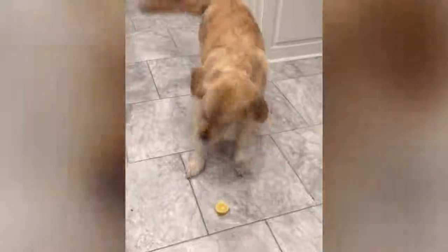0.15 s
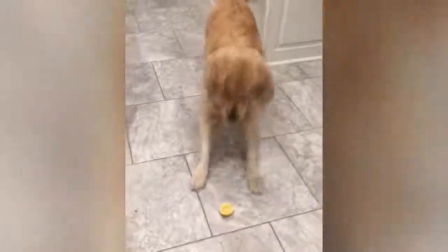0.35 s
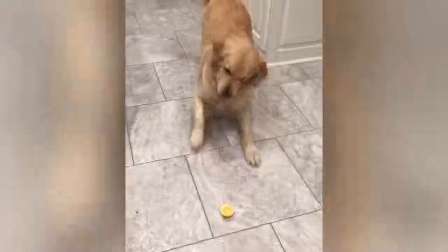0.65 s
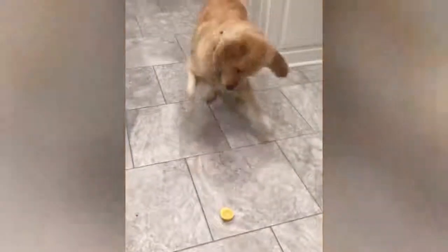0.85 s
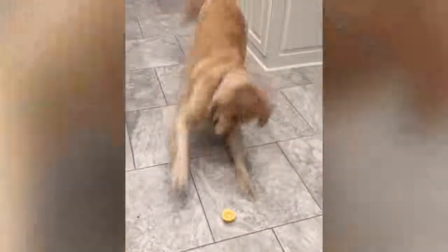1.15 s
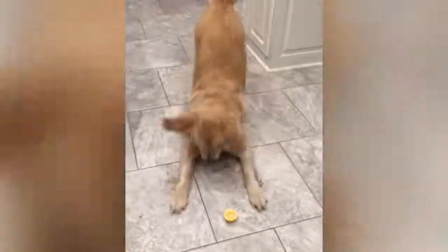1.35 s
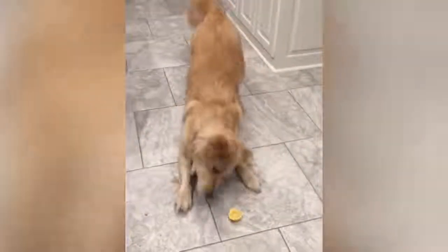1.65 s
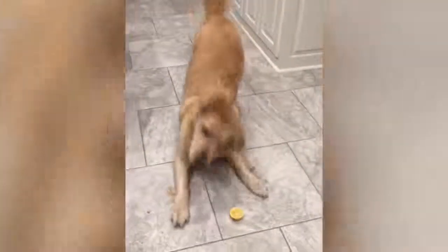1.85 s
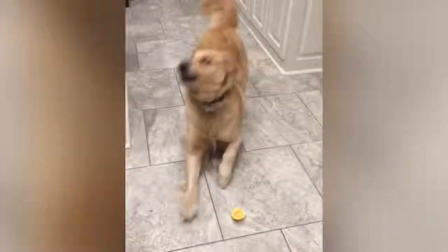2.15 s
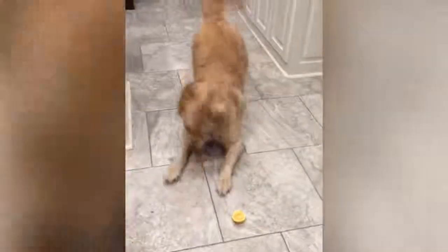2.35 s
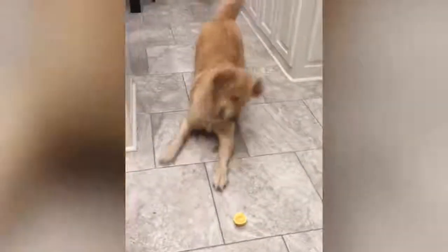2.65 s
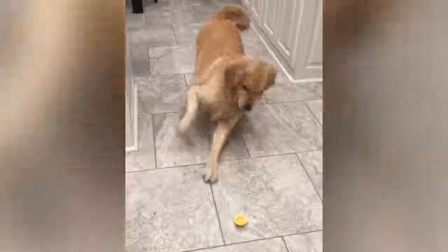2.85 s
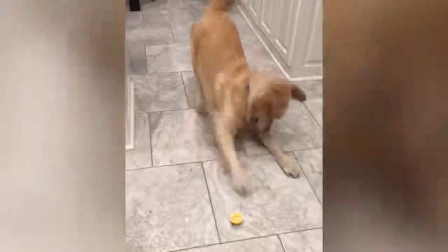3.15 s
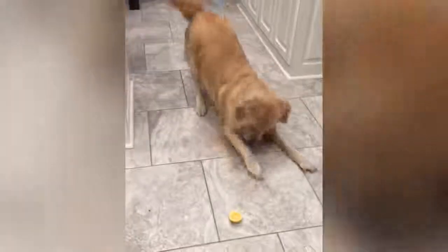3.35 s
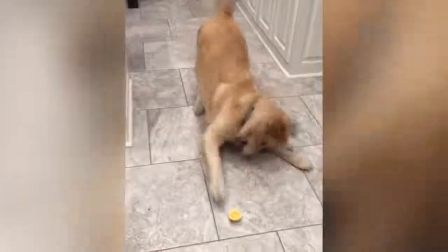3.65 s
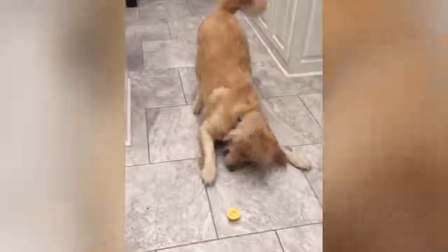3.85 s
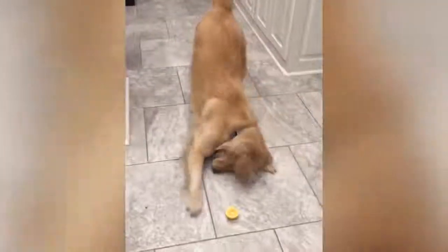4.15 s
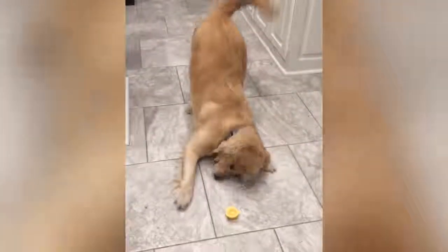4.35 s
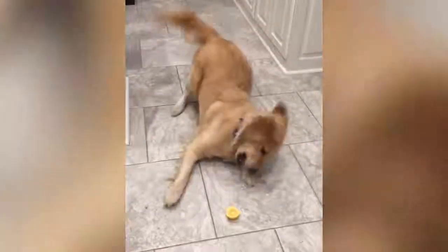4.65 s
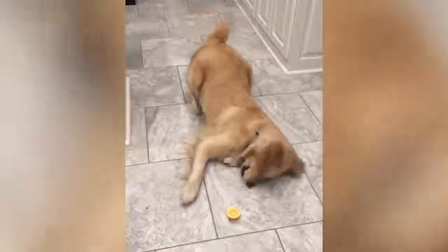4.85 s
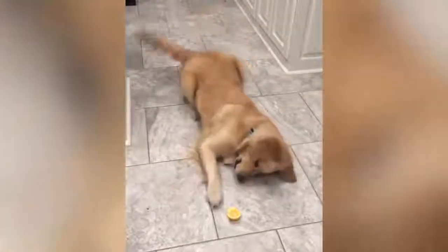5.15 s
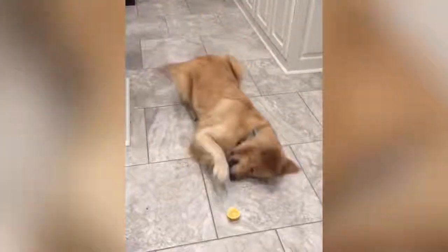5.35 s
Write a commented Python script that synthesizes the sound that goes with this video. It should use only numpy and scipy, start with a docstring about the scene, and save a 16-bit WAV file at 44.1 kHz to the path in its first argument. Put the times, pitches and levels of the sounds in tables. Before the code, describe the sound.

A dog plays on a tiled kitchen floor, a step or two away, over a very faint low hush. From about 0.4 seconds its claws click sharply several times, with a breathy nose huff at 0.5. At 1.3 it lands a pounce with a loud clack, a pad slap and soft body thumps. Between 1.9 and 2.6 its metal collar tags clink lightly amid more clacks and gritty scrapes, with another huff at 2.3. Scrabbling and short huffs lead to a second hard landing at 3.2. Faint pad squeaks follow near 3.6, then single sharp clacks at 3.7 and 4.2, the first with a huff, the second with a thump. Fur and paws then rub softly along the floor. A tag rings near 5 seconds, followed by one more clack and small snort-like sputters around 5.3. The hard room rings briefly throughout.

```python
"""Scrapes and sharp claw clacks on kitchen tile: a dog pounces, scuffles and rubs its face on the floor.
Claws strike the hard glaze, pads slap and squeak, the body thumps down, paws and fur drag along.
The dog huffs through its nose, with a few snort-like sputters, and two metal tags clink on its collar.
It is all a step or two away, in a hard room that rings briefly."""
import sys
import numpy as np
from scipy import signal
from scipy.io import wavfile

SR = 44100
rng = np.random.default_rng(int(sys.argv[2]) if len(sys.argv) > 2 else 0)


def to_wav(s):
    """Save 16-bit WAV."""
    ch = np.atleast_2d(s).T  # columns
    pcm = np.round(np.clip(ch, -1, 1) * 32767)  # PCM
    wavfile.write(sys.argv[1], SR, pcm.astype(np.int16))


N = 243431
TIME = np.arange(N) / SR


def amp(db):
    """Decibels to gain."""
    return 10 ** (np.asarray(db) / 20)


def unit(x):
    """Scales to rms 1."""
    return x / np.sqrt(np.mean(x ** 2) + 1e-20)


def read(points, hz):
    """Reads a curve along a logarithmic frequency axis."""
    freqs, values = np.transpose(points)
    return np.interp(np.log(hz + 1e-6), np.log(freqs), values)


def add(mix, start, sound):
    """Mixes a sound in at a start time in seconds."""
    part = mix[max(round(start * SR), 0):][:len(sound)]
    part += sound[:len(part)]


def colour(x, tone, size=4096):
    """Shapes a sound with an EQ curve of (Hz, dB) points: a minimum-phase filter of energy 1."""
    log_gain = np.log(amp(read(tone, abs(np.fft.fftfreq(size, 1 / SR)))))
    spectrum = np.exp(np.conj(signal.hilbert(log_gain)))
    impulse = np.fft.ifft(spectrum).real[:size // 2]
    return signal.oaconvolve(x, impulse / np.linalg.norm(impulse))[:len(x)]


def hiss(tone):
    """Steady coloured noise of rms 1."""
    return unit(colour(rng.standard_normal(N), tone))


def flutter(depth_db, step_s):
    """A gain that wanders at random."""
    knots = np.arange(0, N / SR + 1, step_s)
    return amp(depth_db * np.interp(TIME, knots, rng.standard_normal(len(knots))))


def room_tone(level_db=-68.5):
    """The faint, low hush of the still kitchen."""
    # Spectrum of the hush. Each row: frequency in Hz, relative level in dB.
    hush_tone = [(15, -80), (25, -41), (70, -3.5), (166, -1.5), (217, -4), (373, -6.5), (427, -12),
                 (516, -11.5), (607, -11.5), (840, -13), (911, -11.5), (988, -14.5), (1290, -14.5),
                 (16000, -40.5)]
    return amp(level_db) * hiss(hush_tone)


def room(x, wet_db=-4, build_s=0.00047, size=256):
    """The direct sound, a few hard reflections and a short diffuse tail whose top dies first."""
    # Ring of the kitchen. Each row: frequency in Hz, seconds to fall by 60 dB.
    ring_times = [(100, 0.36), (400, 0.64), (1200, 0.42), (3000, 0.52), (7000, 0.42), (15000, 0.2)]
    # Reflections off floor, cabinets and ceiling. Each row: delay in seconds, gain.
    echoes = [(.0021, 0.094), (.0056, 0.14), (0.013, 0.11), (0.0152, .24), (.0235, 0.14)]
    n = SR * 3 // 4
    scatter = rng.standard_normal(n) * (rng.random(n) < 0.15)
    hz, t, spectra = signal.stft(scatter, SR, nperseg=size)
    fade = amp(-60 * t / read(ring_times, hz)[:, None])
    tail = signal.istft(spectra * fade, SR, nperseg=size)[1]
    tail *= 1 - np.exp(-TIME[:len(tail)] / build_s)
    response = amp(wet_db) * tail / np.linalg.norm(tail)
    direct = (0.00011, 1)
    for delay, gain in [direct] + echoes:
        add(response, delay, [gain])
    return signal.fftconvolve(x, response)[:N]


def pad_squeaks(wobble=0.24, slip_s=0.0011):
    """A pad sticks and slips on the glaze: a faint, rough squeak."""
    # Skidding pads. Each row: start in seconds, level in dB, pitch in Hz, length in seconds.
    skids = [(2.184, -58.5, 892, 0.04), (3.118, -59, 878, 0.022), (3.636, -50.5, 1480, 0.0097),
             (3.639, -56.5, 2114, 0.031)]
    out = np.zeros(N)
    for start, db, hz, length in skids:
        t = np.arange(0, length, 1 / SR)
        jitter = np.interp(t / slip_s, np.arange(100), rng.standard_normal(100))
        pitch = hz * (1 + wobble * jitter)
        arch = np.sqrt(np.sin(np.pi * t / length).clip(0))
        add(out, start, amp(db) * arch * np.sin(2 * np.pi * np.cumsum(pitch) / SR))
    return out


def collar_tags(tick_db=-8, tick_s=0.0075, touch_count=4):
    """Two small metal discs chatter together; hard knocks bring out top modes, fur muffles the ring."""
    # Knocks of the tags. Each row: start in seconds, relative levels of the first and second tag in dB,
    # hardness as a treble boost in dB, chatter length in seconds, muffling in dB per second.
    clinks = [(1.068, -63, -70, 12, 0.0053, 1202), (1.899, -44.5, -43, -8, .004, 170),
              (2.122, -50, -57, 11, 0.0085, 300), (2.132, -43.5, -48, 8.5, .0073, 280),
              (2.27, -53, -51, -3, .0014, 246), (2.297, -41, -53, -3, 0.01, 90),
              (2.451, -51.5, -51, -1, 0.01, 404), (2.557, -58, -48.5, 6, 0.012, 298),
              (4.651, -64, -58, 6, 0.0012, 250), (4.868, -57.5, -62, -1, 0.0044, 150),
              (4.9665, -37.5, -66, -1, 0.002, 22), (5.002, -62, -47.5, 8, .0016, 57)]
    # Modes of each disc. Each row: frequency in Hz, relative level in dB, seconds to fall by 60 dB.
    first_tag = [(2611, -21, .3), (5776, -21, .12), (8066, 0, .36), (9865, -11, .16), (12750, -16, .12),
                 (14825, 0, .21)]
    second_tag = [(2213, -18, .25), (7102, 0, .3), (9512, -12, .1), (10640, -8, .14), (12880, -10, .1),
                  (15154, -1, .14)]
    out, t = np.zeros(N), TIME[:SR // 2]
    for start, first_db, second_db, hard_db, chatter, muffle in clinks:
        touches = np.linspace(0, chatter, touch_count)
        drive = sum(t >= touch for touch in touches) / touch_count  # each touch feeds the ring
        ring = drive * amp(-muffle * t)
        for modes, tag_db in ((first_tag, first_db), (second_tag, second_db)):
            for hz, mode_db, t60 in modes:
                treble_share = np.clip((hz - 8000) / 7000, 0, 1)
                # the swinging disc turns each mode towards and away from the listener
                swing_db = 2.5 * np.interp(t, np.linspace(0, 0.5, 60), rng.standard_normal(60))
                level = amp(tag_db + mode_db + treble_share * hard_db + swing_db - 60 * t / t60)
                add(out, start, ring * level * np.sin(2 * np.pi * (hz * t + rng.random())))
        tick_gain = amp(first_db + min(hard_db, hard_db / 2) + tick_db)
        for touch in touches:
            tick = np.diff(rng.standard_normal(len(t) + 1)) * np.exp(-t / tick_s)
            add(out, start + touch, tick_gain * tick)
    return out


def nose_huffs(gain_db=-2, rest_hz=1660, relax_s=0.057, size=512):
    """Turbulent air rings in the nose; the resonance sinks towards rest as each huff runs out."""
    # Breaths. Each row: start in seconds, relative level in dB, push in seconds, opening resonance in Hz.
    huffs = [(0.547, -43.5, 0.16, 3200), (1.711, -59.5, 0.0084, 2920), (2.291, -46.5, 0.11, 2900),
             (2.605, -55, .09, 2060), (2.697, -47.5, 0.032, 1866), (2.85, -53.5, 0.035, 2230),
             (3.308, -50.5, 0.058, 2150), (3.353, -51.5, 0.043, 3020), (3.768, -46, 0.096, 3020),
             (3.935, -55, .13, 2020), (5.11, -57, 0.013, 2700), (5.216, -64, 0.011, 1860),
             (5.292, -61, 0.04, 1910)]
    # Nostril colour. Each row: multiple of the resonance, relative level in dB.
    nose_tone = [(.01, -71), (.1, -42), (.22, -14.5), (.4, -11), (.7, -2), (1, 2), (1.3, 3.5), (1.8, -6.5),
                 (3, -14.5), (7, -24.5)]
    rise_s, sag_db_per_s, release_db_per_s = 0.014, 34, 197  # a quick push weakens, then lets go
    out, t = np.zeros(N), TIME[:SR // 2]
    gusts = flutter(depth_db=2.5, step_s=0.0055)
    for start, db, push, start_hz in huffs:
        hz, frame_times, spectra = signal.stft(rng.standard_normal(len(t)), SR, nperseg=size)
        resonance = rest_hz + (start_hz - rest_hz) * np.exp(-frame_times / relax_s)
        spectra *= amp(read(nose_tone, hz[:, None] / resonance))
        breath = unit(signal.istft(spectra, SR, nperseg=size)[1][:len(t)])
        spent_db = sag_db_per_s * t + release_db_per_s * np.maximum(t - push, 0)
        add(out, start, breath * np.minimum(t / rise_s, 1) * amp(db - spent_db))
    return amp(gain_db) * out * gusts


def stroke(crest, speed_up, slow_down, drop_db=11, roundness=1.48):
    """Gain of one movement as it gathers speed, crests and slows; drop_db down at each ramp's far end."""
    from_crest = np.maximum((crest - TIME) / speed_up, (TIME - crest) / slow_down)
    return amp(-drop_db * np.minimum(from_crest, 10) ** roundness)


def scrapes(coat_gain_db=-4, slips_per_s=2500, slip_spread_db=2):
    """Claws catch on the grain of the tile in tiny slips while the coat rubs softly."""
    # Sweeps of paw and fur. Each row: fastest moment in seconds, relative levels of grit and coat in dB,
    # seconds speeding up, seconds slowing down.
    strokes = [(0.298, -57.5, -65, 0.014, 0.032), (.44, -59.5, -70, 0.13, 0.25),
               (.735, -60, -53, 0.027, 0.07), (.785, -58, -55, .04, 0.032), (1.15, -57, -63, 0.033, 0.24),
               (1.32, -58, -65, 0.014, 0.11), (1.41, -62.5, -54.5, 0.092, 0.077),
               (1.54, -59.5, -73, 0.049, 0.049), (1.735, -60, -60, 0.0078, 0.031),
               (1.97, -68, -85, 0.19, 0.4), (2.13, -58.5, -67.5, 0.058, 0.15),
               (2.29, -60, -60, 0.082, 0.034), (2.47, -58, -86, 0.037, 0.041),
               (2.56, -57.5, -85, .035, 0.049), (2.73, -63, -51.5, 0.12, .1),
               (2.90, -61, -53.5, 0.013, 0.036), (3.009, -68, -60.5, 0.042, 0.068),
               (3.20, -55.5, -66, 0.031, 0.087), (3.30, -58.5, -57, 0.027, 0.1),
               (3.37, -74, -54, 0.057, 0.029), (3.509, -63.5, -59.5, 0.16, 0.055),
               (4.02, -75, -55.5, 0.03, 0.026), (4.18, -59.5, -61.5, 0.24, 0.16),
               (4.55, -58.5, -54, 0.17, 0.13), (4.91, -61, -68, 0.065, 0.11),
               (5.136, -56, -64, 0.014, 0.025), (5.17, -75, -55, 0.015, 0.023),
               (5.31, -66, -55.5, 0.016, 0.032)]
    # Spectra of the bright grit and the dull coat. Each row: frequency in Hz, relative level in dB.
    grit_tone = [(300, -52), (1200, -22), (2500, -5), (4300, -3.5), (6000, 1.5), (8000, -3), (9600, -2),
                 (11000, -9), (15500, -12.5)]
    coat_tone = [(25, -56), (60, -26), (120, -1.5), (260, -7), (470, -8.5), (750, -3), (1500, 0.5),
                 (2600, -3), (4300, -7.5), (8000, -62)]
    sizes = amp(slip_spread_db * np.minimum(rng.exponential(1, N), 4))
    slips = (rng.random(N) < slips_per_s / SR) * rng.choice([-1, 1], N) * sizes
    friction = unit(slips) + 0.15 * rng.standard_normal(N)  # a little hiss smooths the crackle
    grit = unit(colour(friction, grit_tone)) * flutter(depth_db=1.4, step_s=0.017)
    coat = hiss(coat_tone)
    grit_power, coat_power = np.zeros(N), np.zeros(N)
    for crest, grit_db, coat_db, speed_up, slow_down in strokes:
        speed = stroke(crest, speed_up, slow_down)
        grit_power += (amp(grit_db) * speed) ** 2
        coat_power += (amp(coat_db) * speed) ** 2
    return grit * np.sqrt(grit_power) + amp(coat_gain_db) * coat * np.sqrt(coat_power)


def landings(gain_db=-2.5, rise_share=0.13, puff_db=-3):
    """Pads pop high, the body thumps low: each soft blow rings a few cycles inside a puff of noise."""
    # Paws and chest meeting the floor.
    # Each row: start in seconds, relative level in dB, pitch in Hz, decay in seconds.
    blows = [(1.2698, -38, 970, .0025), (1.2702, -44, 518, 0.0031), (1.289, -50, 210, 0.019),
             (1.375, -50, 140, 0.014), (1.402, -43, 180, 0.015), (2.159, -58, 632, 0.01),
             (2.322, -45, 137, .012), (2.7119, -47.5, 700, 0.0022), (3.001, -56, 197, 0.012),
             (3.2419, -32, 764, 0.0023), (3.251, -49, 453, 0.018), (3.265, -39, 204, 0.015),
             (4.187, -49.5, 565, 0.0052), (4.19, -42.5, 218, 0.015)]
    # Spectrum of the puff. Each row: multiple of the blow's pitch, relative level in dB.
    puff_shape = [(.1, -49), (.3, -12.5), (.55, -4), (1, -3), (1.5, -4), (2.5, -20.5), (8, -58)]
    out, t = np.zeros(N), TIME[:SR // 4]
    for start, db, hz, decay in blows:
        swell = (1 - np.exp(-t / (rise_share * decay))) * np.exp(-t / decay)
        puff_tone = [(multiple * hz, level) for multiple, level in puff_shape]
        puff = colour(swell * rng.standard_normal(len(t)), puff_tone)
        thump = swell * np.sin(2 * np.pi * hz * t) + amp(puff_db) * puff
        add(out, start, amp(db) * thump / swell.max())
    return amp(gain_db) * out


def clacks_and_sputters(gain_db=2, scratch_db=-20, scratch_s=0.004, tick_s=0.000071, ticks=4):
    """Sharp clacks as claws hit the tile one after another, plus a few duller, snort-like sputters."""
    # Bursts of ticks. Each row: start in seconds, relative level in dB, tilt in dB per octave
    # (steeply down for the sputters), seconds over which the ticks spread.
    bursts = [(0.426, -34, 2.5, 0.011), (.5020, -32.5, 1, .002), (0.5473, -26.5, -3, 0.0039),
              (.6144, -31.5, -0.5, 0.0026), (0.7029, -31, -3.5, .008), (1.126, -24, 1, 0.0075),
              (1.2651, -15.5, 2, .003), (1.497, -43, -2.5, 0.0034), (1.530, -53, -8, 0.0088),
              (1.730, -54, 3, 0.0063), (1.8674, -36.5, 2, 0.0051), (2.271, -39, 2, 0.0021),
              (2.3012, -27.5, -2, 0.015), (2.375, -33.5, 5, .004), (2.711, -27.5, -6, 0.0021),
              (2.73, -33, 6, 0.0059), (2.890, -33.5, -7, 0.0033), (2.9873, -40.5, 1, 0.015),
              (3.192, -28.5, 0, .009), (3.2370, -16, 1, .002), (3.3661, -24.5, -5.5, 0.00091),
              (3.6017, -36, 2, 0.0046), (3.7488, -18, -1, 0.0014), (3.943, -38, -8, 0.0024),
              (4.1807, -18, -0.5, 0.0019), (4.8635, -41, 7, .003), (5.1164, -27.5, -0.5, .004),
              (5.2904, -44, -9, 0.0024), (5.307, -42.5, -10.5, 0.0016)]
    # Spectrum of a burst before its tilt. Each row: frequency in Hz, relative level in dB.
    burst_tone = [(30, -75), (200, -29), (700, -23), (1500, -5), (3000, -2.5), (4500, -1), (6200, 2.5),
                  (8000, -0.5), (11000, -3.5), (15500, -7.5), (18000, -30)]
    out, t = np.zeros(N), TIME[:2048]
    for start, db, tilt_db, spread in bursts:
        scratch_fade = np.exp(-t / (scratch_s + spread / 2))
        burst = amp(scratch_db) * rng.standard_normal(len(t)) * scratch_fade
        burst[0] += 1  # the leading tick is a clean click
        for k in range(1, ticks):
            tick = rng.standard_normal(len(t)) * np.exp(-t / tick_s)
            lag = spread * (k + rng.uniform(-0.3, 0.3)) / (ticks - 1)
            add(burst, lag, tick / np.linalg.norm(tick))
        tilted_tone = [(hz, level + tilt_db * np.log2(hz)) for hz, level in burst_tone]
        add(out, start, amp(db) * colour(burst, tilted_tone))
    return amp(gain_db) * out


def scene():
    """The dog in the kitchen, over quiet room tone; the tags clink clearly, with little room ring."""
    dog = clacks_and_sputters() + landings() + nose_huffs() + scrapes() + pad_squeaks()
    tags = collar_tags()
    collar = tags + amp(-14) * room(tags)
    return (room(dog) + collar + room_tone())[None]


def record(dry, cutoff_hz=16200):
    """A steep low-pass trims the very top of the treble."""
    low_pass = signal.firwin(255, cutoff_hz, window=("kaiser", 8), fs=SR)
    return signal.oaconvolve(dry, low_pass[None], "same")


dry = scene()
out = record(dry)
to_wav(out)
```